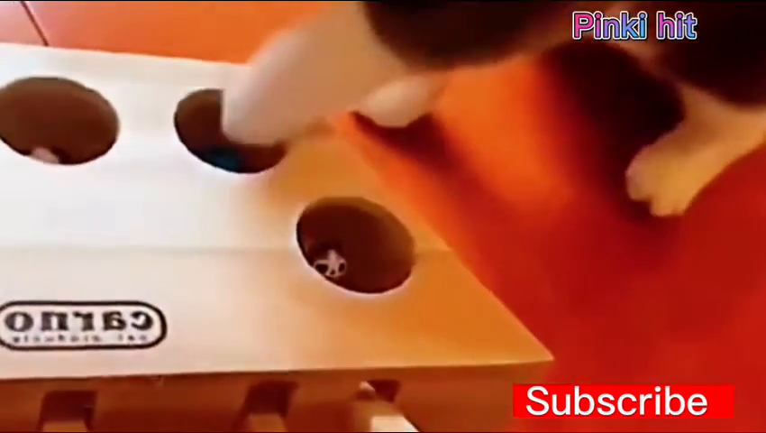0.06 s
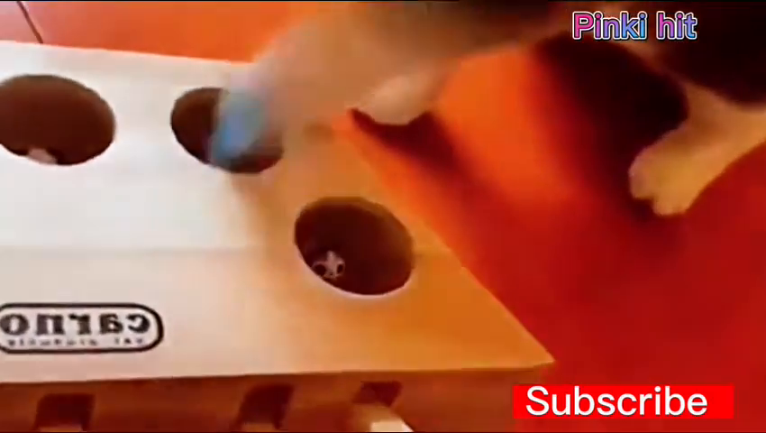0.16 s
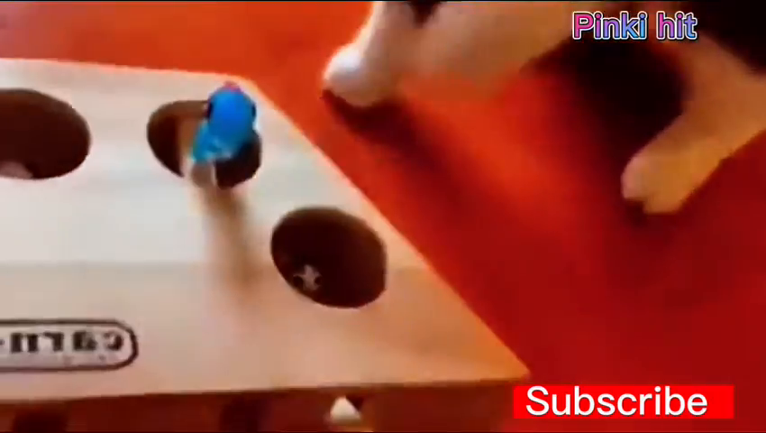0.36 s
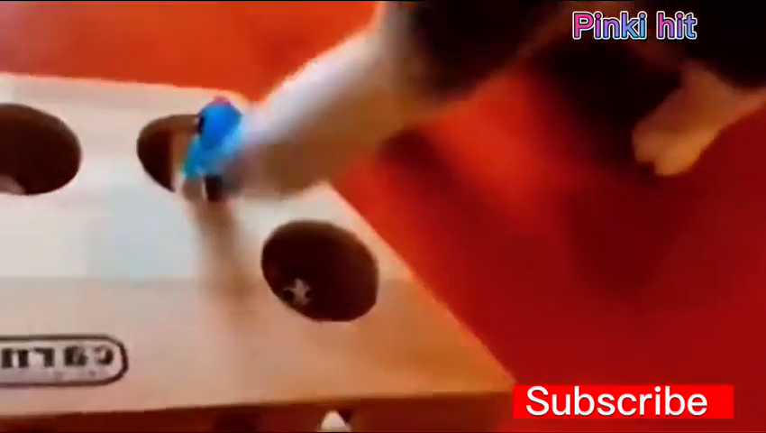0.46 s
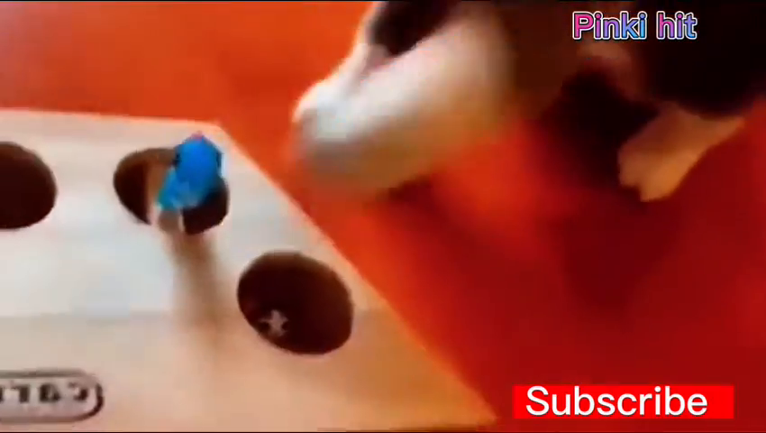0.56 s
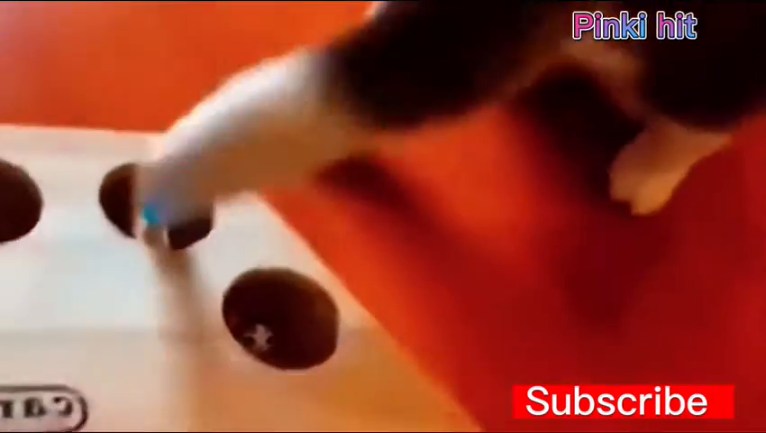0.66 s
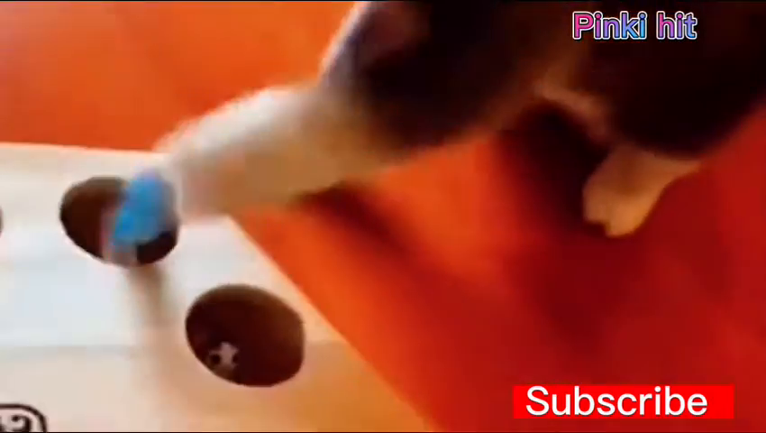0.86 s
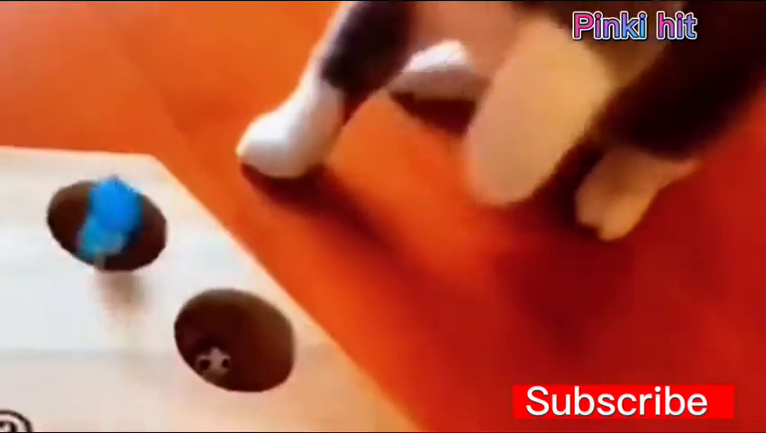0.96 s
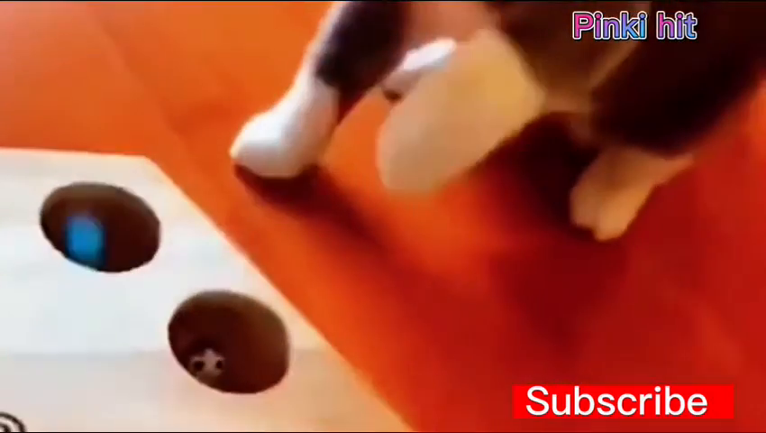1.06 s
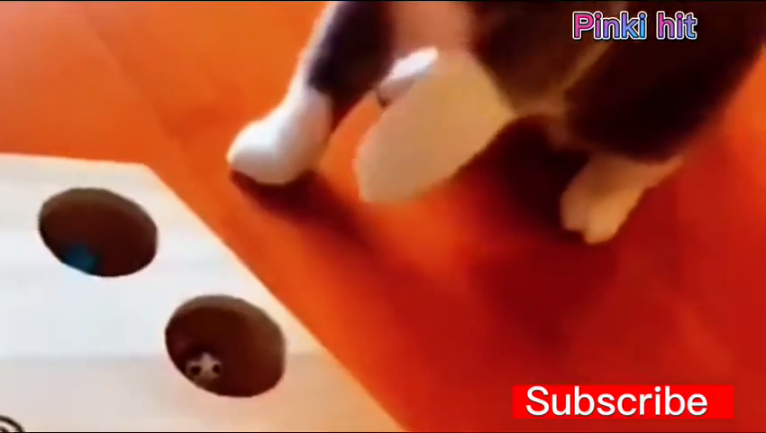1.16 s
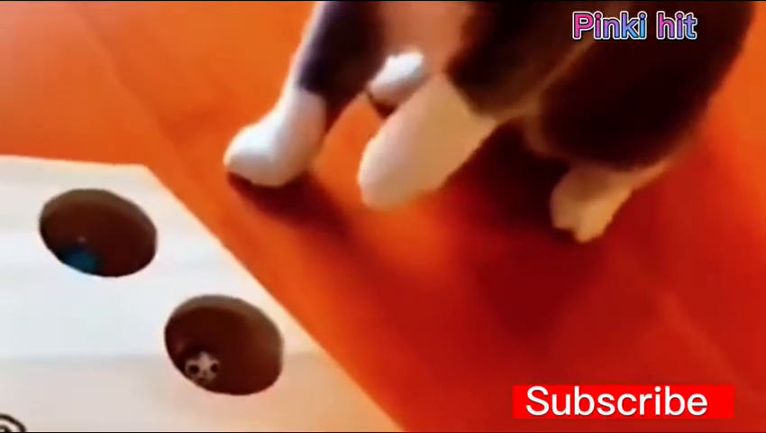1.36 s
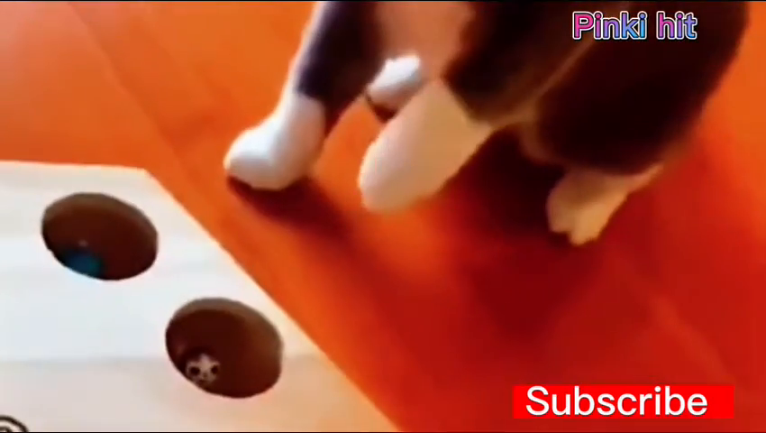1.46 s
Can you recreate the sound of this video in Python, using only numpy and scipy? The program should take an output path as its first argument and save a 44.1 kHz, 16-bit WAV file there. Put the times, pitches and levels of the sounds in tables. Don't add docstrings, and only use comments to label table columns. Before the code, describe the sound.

A cat's paw slams a hollow wooden toy box, taps it, and an inner lever drops and bounces

```python
import sys
import numpy as np
from scipy import signal
from scipy.io import wavfile

SR = 44100
rng = np.random.default_rng(int(sys.argv[2]) if len(sys.argv) > 2 else 0)


def int16_out(signal):
    q = np.round(np.clip(np.atleast_2d(signal).T, -1, 1) * 32767)
    wavfile.write(sys.argv[1], SR, q.astype(np.int16))


def how_loud(loudness_db):
    steps = np.asarray(loudness_db, float) / 20
    return 10 ** steps


N = 66150


def rms_one(x):
    return x / np.sqrt(np.mean(x ** 2) + 1e-20)


def at_hz(points, hz):
    points = np.array(points)
    return np.interp(np.log(hz + 1), np.log(points[:, 0]), points[:, 1])


def band_pass(x, low_hz, high_hz):
    return signal.sosfilt(signal.butter(2, [low_hz, high_hz], "band", fs=SR, output="sos"), x)


def cut(x, hz):
    start = x[..., :1]
    sos = signal.ellip(12, .5, 60, hz - 300, fs=SR, output="sos")
    return start + signal.sosfilt(sos, x - start)


def drift(rate_hz):
    stride, settle = 40, 2000
    pole = np.exp(-2 * np.pi * stride * rate_hz / SR)
    white = rng.standard_normal(N // stride + settle + 2)
    slow = signal.lfilter([1], [1, -2 * pole, pole * pole], white)[settle:]
    return np.interp(np.arange(N) / stride, np.arange(len(slow)), rms_one(slow))


def bands():
    settle = 4000
    edges = 60 * 2 ** np.arange(0, 8.3, .5)
    white = rng.standard_normal((2, N + settle))
    for k, (low, high) in enumerate(zip(edges, edges[1:])):
        yield np.sqrt(low * high), band_pass(white[k % 2], low, high)[settle:]


def coloured(spectrum, patchy_db):
    total = 0
    for hz, band in bands():
        total = total + how_loud(at_hz(spectrum, hz) + patchy_db * drift(6.3)) * band
    return rms_one(total)


def bump(start_s, length_s):
    phase = np.clip((np.arange(N) / SR - start_s) / length_s, 0, 1)
    return np.sin(np.pi * phase) ** 2


def room_tone():
    # f/Hz, level per Hz/dB
    air = [(41, -28), (70, -3.5), (112, -4), (178, -14), (207, -7.5), (403, -16), (431, -21), (1020, -17.5),
           (14000, -71.5)]
    return how_loud(-47.5) * coloured(air, .7)


def rumble():
    # f/Hz, width/Hz, level/dB
    hums = [(38.88, 2.44, -38.5), (60.5, 11, -49.5), (170.45, 7, -51)]
    # t/s, level/dB
    swell = [(0, -4.5), (.2, -1.5), (.4, 1), (.65, -6.5), (.75, -4), (0.951, -2), (1.07, -0.5), (1.201, -5),
             (1.349, -2), (1.5, -3.5)]
    out = 0
    for hz, width_hz, db in hums:
        pole = np.exp(-np.pi * width_hz / SR)
        poles = [1, -2 * pole * np.cos(2 * np.pi * hz / SR), pole * pole]
        hum = rng.standard_normal(2 * N)
        for _ in range(2):
            hum = signal.lfilter([1, 0, -1], poles, hum)
        out = out + how_loud(db) * rms_one(hum[N:])
    return out * how_loud(np.interp(np.arange(N) / SR, *np.transpose(swell)))


def room(x):
    # f/Hz, T60/s
    room_t60 = [(100, 0.46), (260, 0.34), (700, 0.53), (1800, 0.6), (4800, 0.5), (9000, 0.28),
                (14000, 0.45)]
    # f/Hz, level/dB
    room_db = [(100, -10), (300, -29.5), (1000, -31), (3000, -34.5), (7000, -33), (14000, -32)]
    gap_s, build_s = 0.0025, 0.0027
    t = np.arange(N) / SR
    tail = 0
    for hz, band in bands():
        tail = tail + how_loud(at_hz(room_db, hz) - 60 * t / at_hz(room_t60, hz)) * band
    build_up = 1 - np.exp(-np.maximum(t - gap_s, 0) / build_s)
    return signal.fftconvolve(x, tail * build_up)[:N]


def fur():
    # start t/s, length/s, level/dB
    brushes = [
        (0.103, 0.21, -66.5),
        (0.287, 0.45, -68.5),
        (0.841, 0.02, -56),
        (0.851, 0.065, -68.5),
        (1.163, 0.024, -61.5),
        (1.168, 0.11, -72.5),
        (1.449, .1, -96),
    ]
    # f/Hz, level per Hz/dB
    fur_db = [(500, -26.5), (1500, -19.5), (4000, -18.5), (8000, -16.5), (13000, -35.5)]
    return coloured(fur_db, 2) * sum(how_loud(db) * bump(s, length) for s, length, db in brushes)


def claws():
    # t/s, f/Hz, level/dB, length/s
    ticks = [
        (0.8523, 4500, -52, 0.0065),
        (0.8541, 1995, -37.5, 0.002),
        (0.868, 2550, -56, 0.036),
    ]
    white = rng.standard_normal(N)
    out = 0
    for s, hz, db, length in ticks:
        squeak = rms_one(band_pass(white, hz * 0.935, hz * 1.08))
        out = out + how_loud(db) * bump(s - length, 2 * length) * squeak
    return out


def small_modes(spectrum, count=170):
    place = (np.arange(count) + rng.random(count)) / count
    hz = 900 * (14000 / 900) ** place ** .6
    mode_db = at_hz(spectrum, hz) + 2 * rng.standard_normal(count)
    t60 = .02 * (1000 / hz) ** .5
    return list(zip(hz, mode_db, t60))


def knocks(hits, modes):
    rise_cycles, strength_spread_db, scatter_s = 1.4, 1.5, .003
    out, t = np.zeros(N + SR), np.arange(SR // 10) / SR
    hz, mode_db, t60 = np.transpose(modes)[:, :, None]
    luck = rng.standard_normal((len(hits), len(modes), 1))
    late = rng.random((len(hits), len(modes), 1))
    dispersion = .0008 * (1000 / hz) ** .75
    for (s, db, cut_hz), own, wait in zip(hits, luck, late):
        i = int(s * SR)
        lag = dispersion + scatter_s * wait ** 2 * (hz > 2500)
        age = np.maximum(t - (s * SR - i) / SR - lag, 0)
        polarity = np.where(hz > 1000, np.sign(own), 1)
        contact = 1 / (1 + (hz / cut_hz) ** 2)
        gain = how_loud(db + mode_db + strength_spread_db * own) * polarity * contact
        shape = (1 - np.exp(-age * hz / rise_cycles)) ** 2 * how_loud(-60 * age / t60)
        out[i:i + len(t)] += np.sum(gain * shape * np.sin(2 * np.pi * hz * age), axis=0)
    return out[:N]


def lever_taps():
    # t/s, level/dB, contact cut f/Hz
    taps = [(.156, -46, 1000), (.8555, -26, 1000), (.877, -40, 1200), (1.1052, -9, 5000), (1.138, -20, 900),
            (1.173, -15, 1600), (1.189, -28, 900), (1.206, -28, 1300), (1.218, -17, 900), (1.247, -26, 800),
            (1.2625, -30, 800)]
    # f/Hz, level/dB, T60/s
    tap_modes = [(216, -8, 0.05), (419.8, 4, 0.042), (461.3, -0.5, 0.055), (709, -4.5, 0.04),
                 (874, 1.5, 0.027), (1147, -8.5, 0.024), (1460, -15.5, .04), (2190, 1, 0.005),
                 (4400, -42.5, 0.0121)]
    # f/Hz, level/dB
    tap_crack = [(900, -47), (1500, -15.5), (2100, -15), (2700, -26.5), (3200, -24.5), (7000, -34),
                 (10000, -42), (14000, -42)]
    return knocks(taps, tap_modes + small_modes(tap_crack))


def hard_slam():
    # t/s, level/dB, contact cut f/Hz
    slams = [
        (.2145, -8, 9000),
        (.229, -15, 1300),
        (.2525, -23, 1300),
    ]
    # f/Hz, level/dB, T60/s
    slam_modes = [(235, -2, 0.067), (327, 2.5, 0.056), (439, -0.5, 0.069), (521, -10, 0.039),
                  (538, -11.5, 0.11), (720, -4.5, 0.066), (807, -4.5, 0.055), (860, 4, 0.063),
                  (1110, 10, 0.011), (1471, -10.5, 0.048), (2011, 6.5, 0.017), (2375, 1.5, 0.019),
                  (4070, -5, 0.011), (13600, -23.5, 0.023)]
    # f/Hz, level/dB
    slam_crack = [(900, -32), (1500, -6), (2800, -12), (3400, -18), (4200, -20.5), (6000, -19), (9000, -18),
                  (14000, -32.5)]
    return knocks(slams, slam_modes + small_modes(slam_crack))


def scene():
    slams, taps = hard_slam(), lever_taps()
    treble_cut_hz = 13500
    paw = claws() + cut(fur(), treble_cut_hz)
    escaping = signal.lfilter(*signal.butter(1, 600, "high", fs=SR), taps)
    far = room(how_loud(-2.5) * slams + how_loud(-3) * escaping + how_loud(-4.5) * paw)
    far = far + room_tone() + rumble()
    return (slams + taps + paw + cut(far, treble_cut_hz))[None]


def roll_off(x):
    return signal.sosfilt(signal.butter(12, 14570, fs=SR, output="sos"), x)


def record(dry):
    smear_s = .026
    ramp = np.arange(int(smear_s * SR)) / (smear_s * SR)
    kernel = how_loud(-45) * ramp ** 1.3 * rng.standard_normal(SR // 10)[:len(ramp)]
    high_pass = signal.butter(2, 1200, "high", fs=SR, output="sos")
    treble = signal.sosfilt(high_pass, dry[0] - dry[0, 0])
    smeared = dry + signal.fftconvolve(treble, kernel)[len(ramp) - 1:]
    return roll_off(cut(smeared, 14600))


dry = scene()
out = record(dry)
int16_out(out)
```